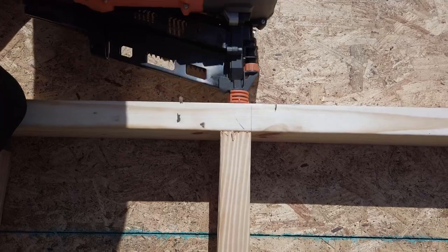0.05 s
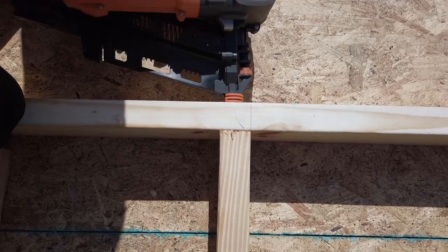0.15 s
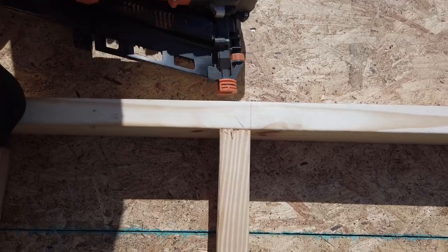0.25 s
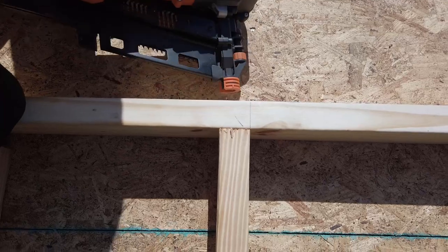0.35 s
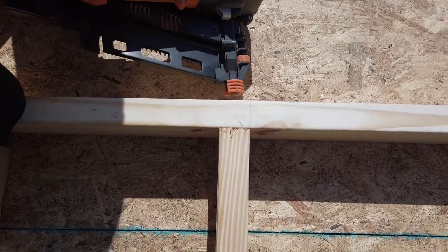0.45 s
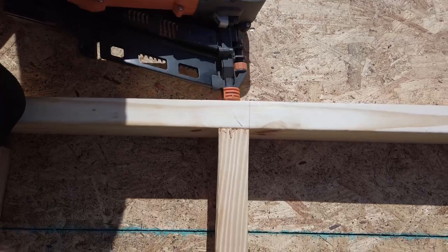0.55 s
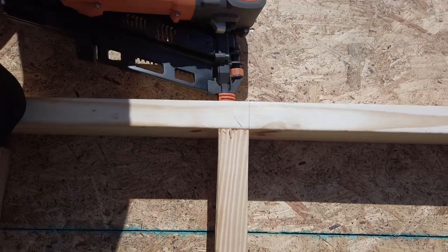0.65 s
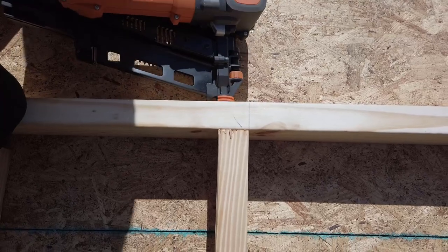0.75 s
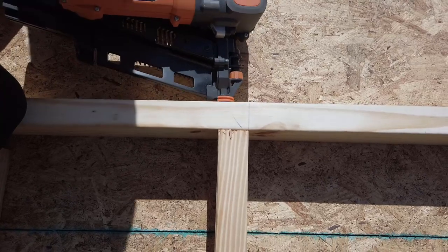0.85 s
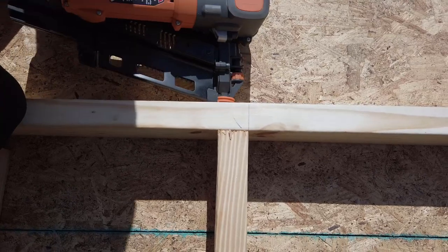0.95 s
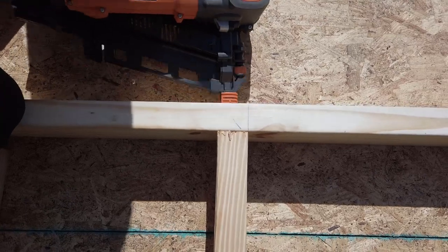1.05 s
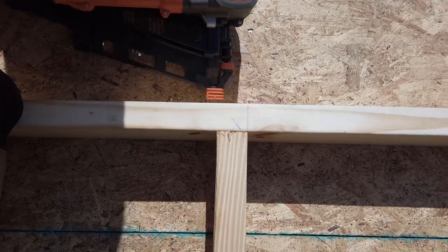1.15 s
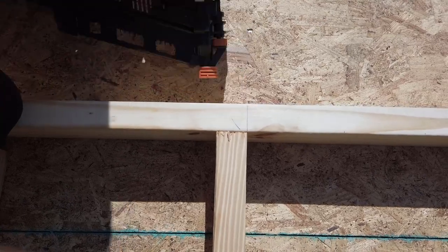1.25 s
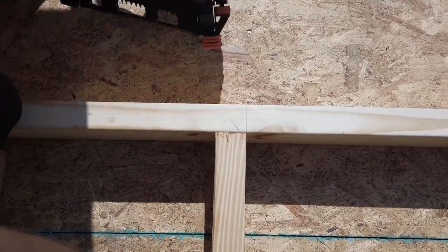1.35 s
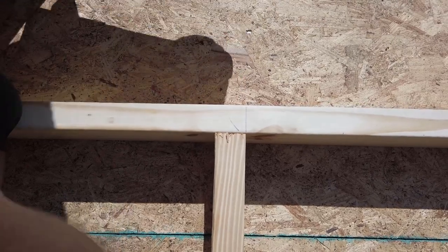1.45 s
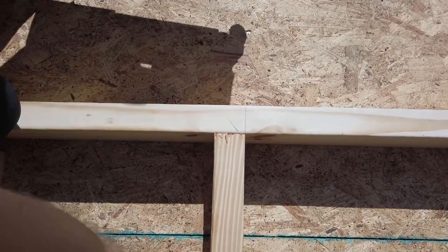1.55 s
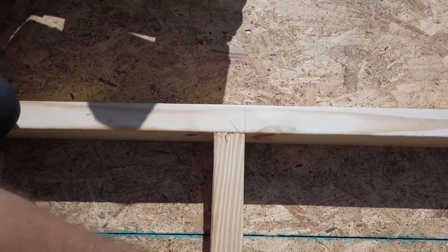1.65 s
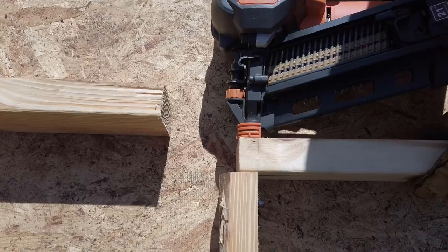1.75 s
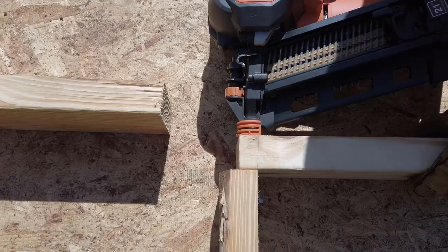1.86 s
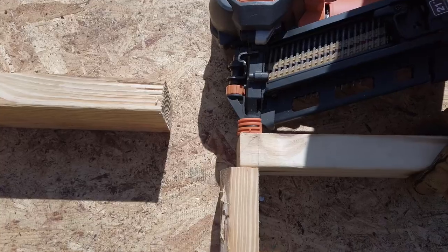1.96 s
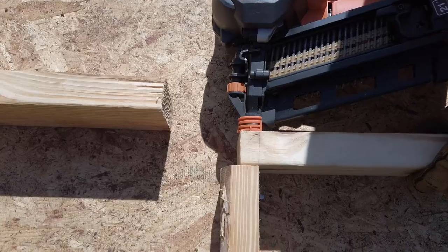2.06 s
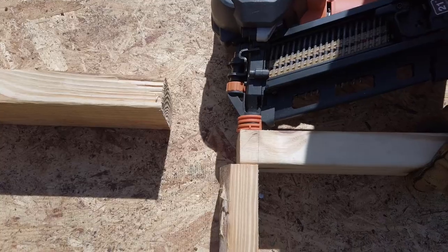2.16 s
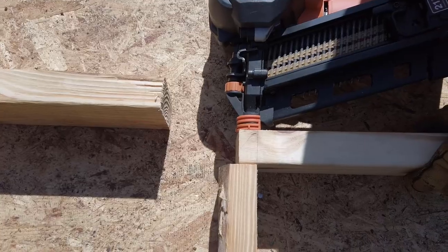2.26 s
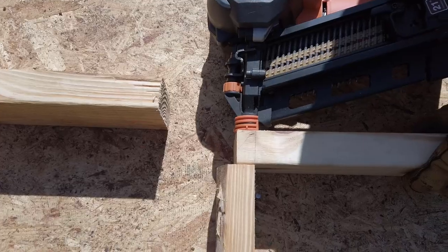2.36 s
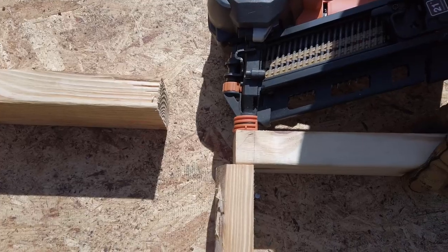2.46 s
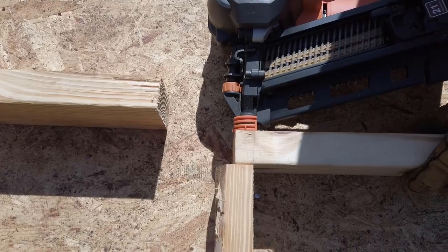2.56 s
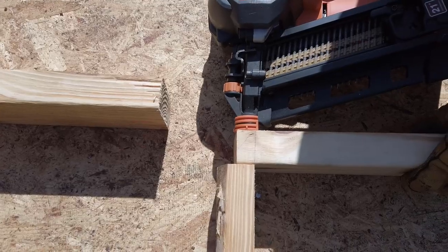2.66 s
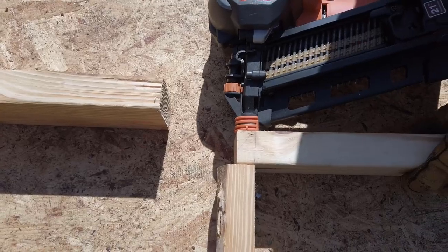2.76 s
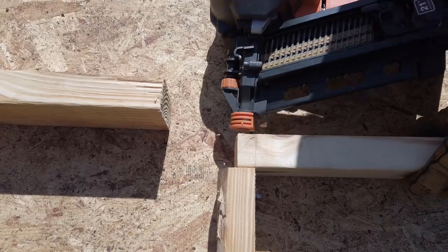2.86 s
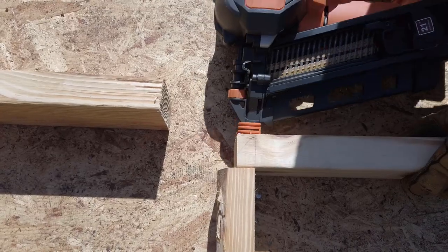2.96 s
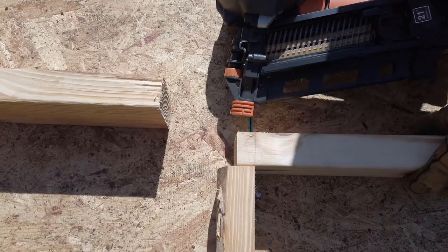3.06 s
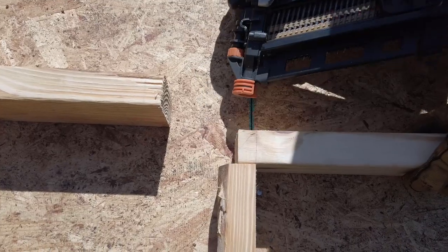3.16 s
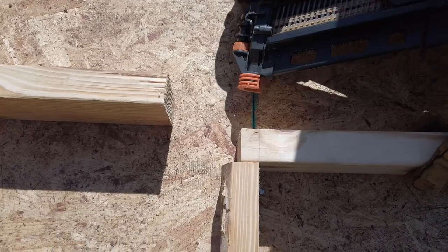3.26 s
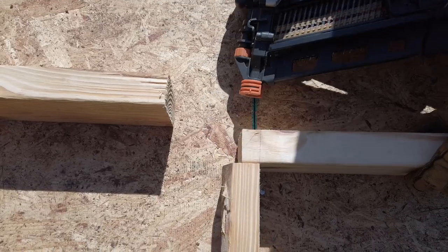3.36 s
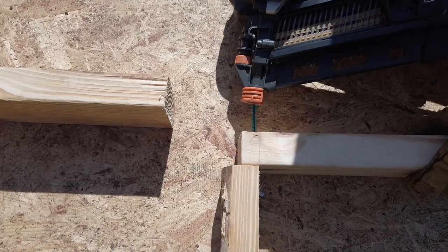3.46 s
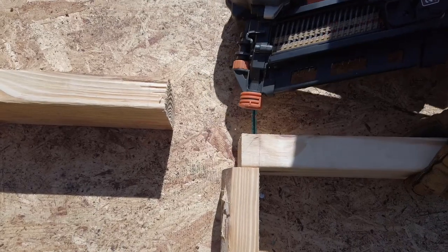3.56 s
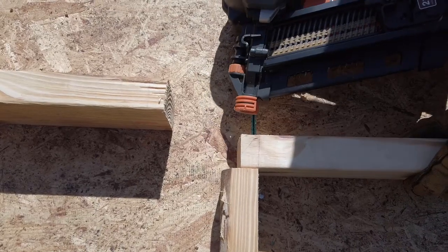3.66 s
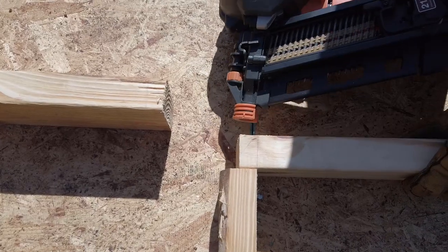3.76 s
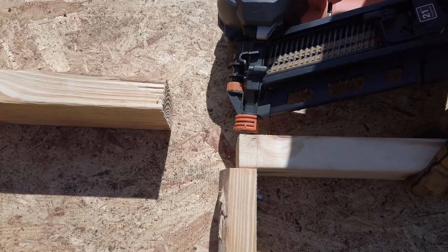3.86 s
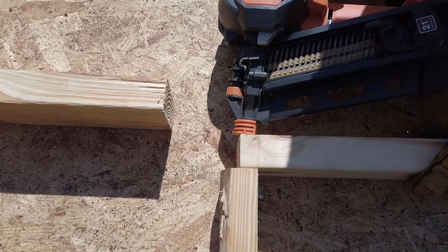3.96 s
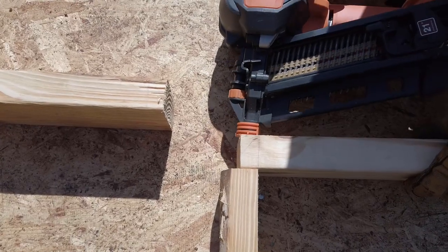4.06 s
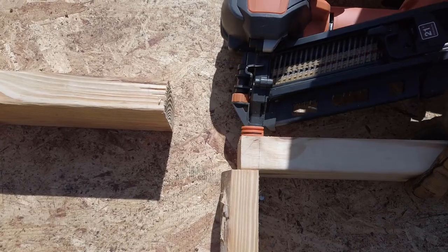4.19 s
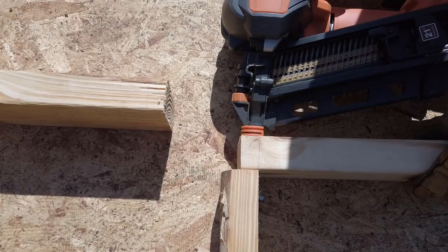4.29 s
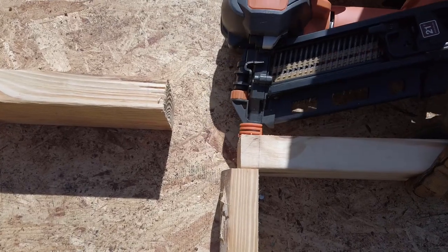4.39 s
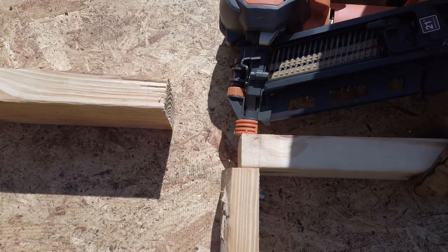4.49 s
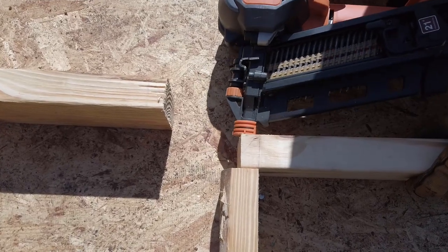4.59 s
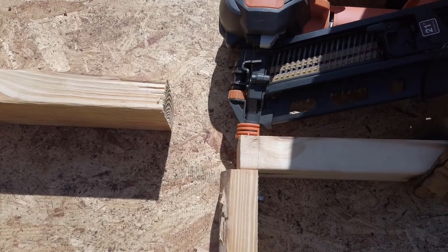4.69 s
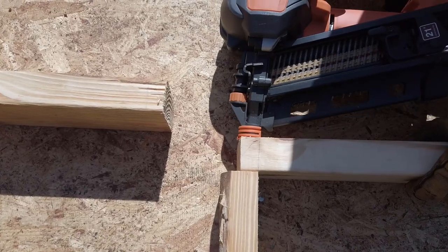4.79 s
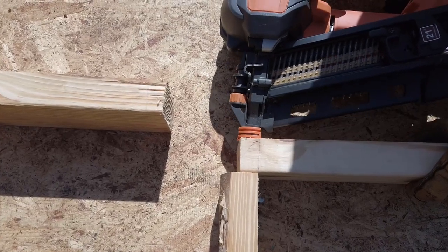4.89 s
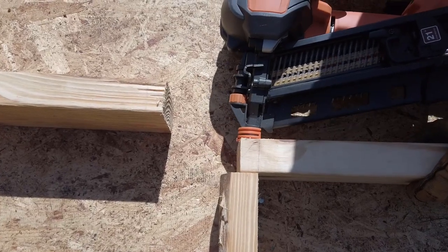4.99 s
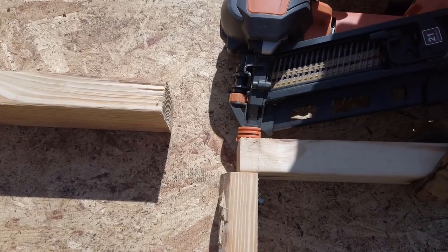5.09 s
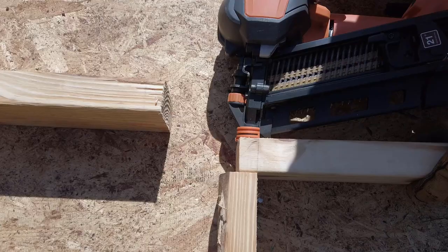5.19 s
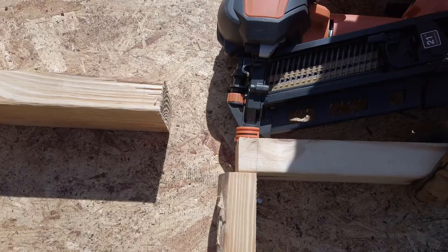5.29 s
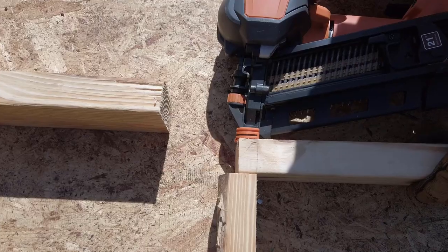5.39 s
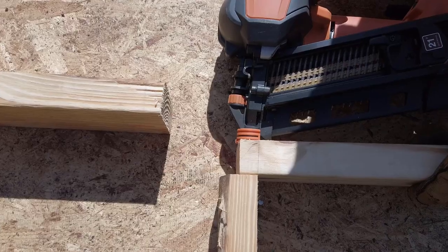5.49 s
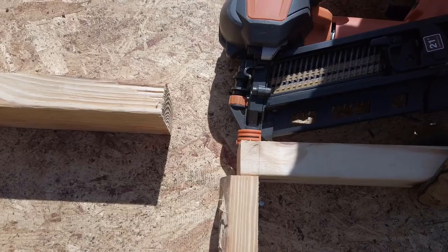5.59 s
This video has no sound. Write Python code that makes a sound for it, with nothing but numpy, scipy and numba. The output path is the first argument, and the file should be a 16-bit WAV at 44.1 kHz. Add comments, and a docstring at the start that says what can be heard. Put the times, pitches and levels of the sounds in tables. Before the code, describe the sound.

Nail gun heard very close on a wooden deck with a faint short echo. Two punchy, boomy shots over a steady low compressor drone that dips after each blow; then a hard cut to faint rumble and thin hiss, a louder, drier third crack with scrape and motor whirr, the tool rocking down, and scattered light ticks.

```python
"""A framing nailer drives three nails into studs on a wooden deck, close to the microphone.
Each cycle: gears rasp and whine, noise bursts make the crack and the nail's scrape, damped tones ring stud and deck.
Short ticks ring the steel nose as it touches the wood, and soft low pushes bump the deck.
A compressor (hum partials and coloured noise) runs for the first two nails; then the scene cuts to a quieter spot.
Loud sound pushes the recorder's gain down, so the background ducks and slowly returns."""
import sys
import numpy as np
from scipy import signal
from scipy.fft import rfft, irfft, next_fast_len
from scipy.io import wavfile
from scipy.ndimage import uniform_filter1d
from numba import njit

SR = 44100
rng = np.random.default_rng(int(sys.argv[2]) if len(sys.argv) > 2 else 0)


def master(y):
    """Save y as 16-bit WAV."""
    cut = np.clip(np.atleast_2d(y).T, -1, 1)
    pcm = np.round(cut * 32767)  # scale
    wavfile.write(sys.argv[1], SR, pcm.astype(np.int16))


N = 248415
T = np.arange(N) / SR  # time of every sample in seconds
CUT_S = 1.732  # the scene cuts from beside the compressor to a quieter spot


def amp(db):
    """Turn decibels into a gain."""
    return 10 ** (np.asarray(db) / 20)


def curve(rows):
    """Join rows of (seconds, value) into a line in time."""
    return np.interp(T, *np.transpose(rows))


def unit(x):
    """Scale to an rms of 1."""
    return x / np.sqrt(np.mean(x ** 2))


def colour(x, points):
    """Filter by a spectrum given as points of (Hz, dB)."""
    hz, db = np.transpose(points)
    size = next_fast_len(N, True)
    f = np.maximum(np.arange(size // 2 + 1) * SR / size, 1)
    gain = amp(np.interp(np.log(f), np.log(hz), db))
    return irfft(rfft(x, size) * gain, size)[..., :N]


# How wide the sound is. Each row: frequency in Hz, level in dB applied to the side signal.
WIDTH = [(30, -22), (130, -33.5), (500, -25.5), (1000, -16), (2000, -8), (4000, -3.5), (8000, -4.5),
         (16000, 1)]


def stereo(mid, side):
    """Make left and right: alike in the bass, apart in the treble."""
    return mid + colour(side, WIDTH) * np.array([[1], [-1]])


def noise(points):
    """Make stereo noise with a given spectrum."""
    return stereo(*unit(colour(rng.standard_normal((2, N)), points)))


def walk(rate):
    """Wander at random with a spread near 1, taking a new target rate times a second."""
    knots = rng.standard_normal(4096)
    return 1.2 * np.interp(T * rate, np.arange(len(knots)), knots)


def ring(modes, length=1):
    """Ring damped tones as after one blow; length scales their decay times."""
    t = T[:SR // 2]
    total = 0
    for k, (hz, db, t60) in enumerate(modes):
        decay = amp(db - 60 * t / (t60 * length))
        total = total + decay * np.sin(2 * np.pi * hz * t) * (-1) ** k  # signs alternate
    return total


def swell(start, rise):
    """Rise to a peak of 1 in rise seconds, then die away."""
    u = np.clip((T - start) / rise, 0, 60)
    return u * np.exp(1 - u)


def envelope(start, attack_s, hold_s, release_s):
    """Full level from start for hold_s; attack and release are the times for 60 dB."""
    early, late = np.maximum(start - T, 0), np.maximum(T - start - hold_s, 0)
    return np.exp(-np.minimum(np.log(1000) * (early / attack_s + late / release_s), 40))


def add(out, start, sound):
    """Mix a sound in at a time in seconds."""
    i = int(start * SR)
    out[..., i:i + sound.shape[-1]] += sound[..., :N - i]


@njit
def lowpass(x, hz):
    """Cut the treble above an edge that moves in time (state-variable filter)."""
    y, b, l = np.empty(len(x)), 0., 0.
    for i in range(len(x)):
        g = np.tan(np.pi * hz[i] / SR)
        v = (b + g * (x[i] - l)) / (1 + g * (g + 1.2))
        y[i] = l + g * v
        b, l = 2 * v - b, 2 * y[i] - l
    return y


# The three nails. Each row: blow time in seconds, then relative levels in dB of the crack, nail,
# deck boom, recoil bump, motor wind-up, motor run-on and air puff.
SHOTS = [(0.172, -12, -4.5, 0.5, -2.5, -26.5, -18.5, -11), (1.171, -12, -2.5, 4, -7, -17.5, -19, -16.5),
         (2.992, 1.5, 5, -9.5, -3.5, -19.5, -9, -22.5)]
# Tones of stud and nailer body. Each row: frequency in Hz, relative level in dB,
# seconds to fall by 60 dB (each use scales this).
TIMBER = [(430, -8.5, .12), (530, -8.5, .1), (673, -4.5, 0.055), (800, -2, 0.043), (886.4, -3, 0.13),
          (1003, -8.5, .1), (1224, 1, 0.064), (1383, 0, 0.06), (1480, -4.5, 0.098), (1559, -7, 0.11),
          (1790, 1.5, .06), (1934, -2.5, .05), (1892, -4, .06), (2157, -1, .05), (2516, -0.5, .05),
          (2660, 3, .05)]
# Tones of the deck. Each row: frequency in Hz, relative level in dB, seconds to fall by 60 dB.
DECK = [(48, -3.5, 0.27), (105, -1, .15), (193, -9.5, 0.18), (210.7, 3.5, 0.15)]
# Spectrum of the driver's crack. Each row: frequency in Hz, relative level in dB per Hz.
CRACK = [(300, -21), (1200, 5.5), (2800, -9), (4000, -2.5), (6000, -11), (8000, -10.5), (10000, -15),
         (12500, -10.5), (16000, -16)]


def nailer(crack_lead_s=.002, crack_rise_s=0.0087, boom_lag_s=.026, boom_rise_s=0.0047, recoil_lag_s=.086,
           blow_db=-11, blow_lag_s=0.0014, blow_rise_s=0.0039, lifter_db=2):
    """The driver strikes the stud, the deck takes up the blow, and the recoiling tool drops back on it."""
    out = nails() + housing(motor())
    crack, puff = noise(CRACK), buffet()
    t = T[:SR // 2]
    blow = ring(TIMBER, length=1.1) * (1 - np.exp(-t / blow_rise_s))
    boom = ring(DECK) * (1 - np.exp(-t / boom_rise_s))
    for s, crack_db, nail_db, boom_db, recoil_db, _, run_db, puff_db in SHOTS:
        out += lifter(s, run_db + lifter_db)
        out += crack * amp(crack_db) * swell(s - crack_lead_s, crack_rise_s)
        out += puff * amp(puff_db) * swell(s - .005, 0.034)  # displaced air reaches the microphone
        add(out, s + blow_lag_s, amp(nail_db + blow_db) * blow)
        add(out, s + boom_lag_s, amp(boom_db) * boom)
        add(out, s + recoil_lag_s, amp(recoil_db) * boom)
    return out


def since_blow(lead_s=.1):
    """Seconds since the blow of the current firing cycle; zero just before it."""
    blows = np.array(SHOTS)[:, 0]
    return np.maximum(T - blows[np.searchsorted(blows[1:] - lead_s, T)], 0)


# The nail slides at full force, then sticks; its friction loses the treble as it slows.
NAIL_LAG_S, NAIL_ATTACK_S, NAIL_HOLD_S, NAIL_RELEASE_S = .006, 0.017, 0.021, 0.23
NAIL_FAST_HZ, NAIL_SLOW_HZ, NAIL_SLOWING_S, NAIL_BRAKING = 3350, 720, .031, 5.5


def nails(scrape_db=-8, side_db=4):
    """Each shank slips through the fibres and rings the stud, ever duller as it slows."""
    speed = 1 / (1 + (since_blow() / NAIL_SLOWING_S) ** NAIL_BRAKING)
    edge_hz = NAIL_SLOW_HZ + (NAIL_FAST_HZ - NAIL_SLOW_HZ) * speed
    slips = rng.standard_normal((2, N)) * amp(2 * walk(700))
    stud = ring(TIMBER, length=0.54)
    wood = unit(signal.oaconvolve(slips, stud[None], axes=1)[:, :N])
    scrape = unit(colour(slips, [(150, -11.5), (450, -0.5), (1500, -2.5), (2800, -3), (5000, -4.0)]))
    grind = wood + amp(scrape_db) * scrape
    mid, side = (lowpass(lowpass(x, edge_hz), edge_hz) for x in grind)
    force = 0
    for s, _, db, *_ in SHOTS:
        force = force + amp(db) * envelope(s + NAIL_LAG_S, NAIL_ATTACK_S, NAIL_HOLD_S, NAIL_RELEASE_S)
    return stereo(mid, amp(side_db) * side) * force


# Gear whine. Each row: multiple of the rate at which teeth mesh, relative level in dB.
# The uneven multiple comes from another gear stage.
WHINE = [(1, -9), (1.63, -15.5), (3, -10.5), (4, -24), (5, -19), (6, -19)]
# Rattle of the running gears. Each row: frequency in Hz, relative level in dB per Hz.
GEARS = [(200, 0), (330, -2.5), (550, 0), (900, -4.5), (1400, -5), (2000, -1.5), (2800, -8), (3300, -8.5),
         (4400, -13), (5500, -17.5), (6500, -21.5), (8500, -16.5), (12000, -21.5), (16000, -31.5)]
# Rasp of the gears taking up the load. Each row: frequency in Hz, relative level in dB per Hz.
RASP = [(250, -9.5), (600, -6.5), (1000, -2), (1800, 2), (2600, -0.5), (3100, -8.5), (3800, -3),
        (4500, -10), (6500, -22), (8500, -17.5), (12000, -18), (16000, -23)]
# The motor winds up just before the blow.
WIND_LEAD_S, WIND_ATTACK_S, WIND_HOLD_S, WIND_RELEASE_S = .032, .055, .01, .08
# It runs on after the blow to draw the piston back, stops, and the gears coast.
RUN_LAG_S, RUN_ATTACK_S, RUN_HOLD_S, RUN_RELEASE_S, RUN_SAG_DB_PER_S = 0.04, .07, .219, 0.055, 15.5
COAST_DB, COAST_RELEASE_S = -21, .27  # level relative to the run-on
# The mesh rate sinks from free to loaded, and the whine grows out of the rattle.
MESH_FREE_HZ, MESH_LOADED_HZ, MESH_SAG_S = 1839, 1320, .135
WHINE_DB, WHINE_GROWTH_DB_PER_S = -7, 47.5


def motor(knocks_per_mesh=0.13, chatter=.4, waver=0.011):
    """Gears rasp as they take up the load, then rattle and whine; the pitch sinks as the air spring stiffens."""
    loaded_s = np.minimum(since_blow(), RUN_LAG_S + RUN_HOLD_S)
    mesh_hz = MESH_LOADED_HZ + (MESH_FREE_HZ - MESH_LOADED_HZ) * np.exp(-loaded_s / MESH_SAG_S)
    phase = 2 * np.pi * np.cumsum(mesh_hz * (1 + waver * walk(700))) / SR
    knocking = 1 + chatter * np.sin(knocks_per_mesh * phase + walk(90))
    knocking = knocking * amp(1.25 * walk(70))
    partials = sum(amp(db + 3.5 * walk(40)) * np.exp(1j * k * phase) for k, db in WHINE)
    partials = partials * (.5 + .5 * (walk(260) + 1j * walk(260)))  # worn teeth make the whine rough
    whine_gain = amp(WHINE_DB + WHINE_GROWTH_DB_PER_S * loaded_s)
    whine = whine_gain * stereo(partials.real, partials.imag)
    winding = running = coasting = 0
    for s, *_, wind_db, run_db, _ in SHOTS:
        wind = envelope(s - WIND_LEAD_S, WIND_ATTACK_S, WIND_HOLD_S, WIND_RELEASE_S)
        run = envelope(s + RUN_LAG_S, RUN_ATTACK_S, RUN_HOLD_S, RUN_RELEASE_S)
        coast = envelope(s + RUN_LAG_S, RUN_ATTACK_S, RUN_HOLD_S, COAST_RELEASE_S)
        winding = winding + amp(wind_db) * wind
        running = running + amp(run_db - RUN_SAG_DB_PER_S * loaded_s) * run
        coasting = coasting + amp(run_db + COAST_DB) * coast
    rattle = noise(GEARS) * np.maximum(running, coasting)
    return (noise(RASP) * winding + rattle) * knocking + whine * running


# Narrow bands of the motor housing. Each row: frequency in Hz, width in Hz, lift in dB.
HOUSING = [(1400, 110, 3.5), (2480, 220, 7), (3740, 580, 4.5), (7530, 250, 9)]


def housing(x, inner_db=-7, inner_t60_s=0.071, inner_hz=3000):
    """The hollow casing lifts a few narrow bands and rings briefly in the treble."""
    f = np.geomspace(100, 16000, 600)
    lift = sum(db / (1 + (2 * (f - hz) / width) ** 2) for hz, width, db in HOUSING)
    treble = signal.butter(2, inner_hz, "high", fs=SR, output="sos")
    inner = signal.sosfilt(treble, rng.standard_normal(SR // 16))
    inner = inner * amp(-60 * T[:SR // 16] / inner_t60_s)
    inner = inner / np.linalg.norm(inner)
    x = x + amp(inner_db) * signal.oaconvolve(x, inner[None], axes=1)[:, :N]
    return colour(x, np.column_stack([f, lift]))


def lifter(start, db, first_s=0.11, step_s=0.048, hz=460, sag_hz=40, rise_s=0.002, count=4):
    """The lifter's pins catch the driver blade one after another, each with a slightly deeper knock."""
    times = start + first_s + step_s * np.arange(count) + 0.0042 * rng.standard_normal(count)
    knocks = 0
    for k, s in enumerate(times):
        knocks = knocks + swell(s, rise_s) * np.sin(2 * np.pi * (hz - sag_hz * k) * (T - s))
    return amp(db) * knocks


# The nose and its safety catch touch the wood. Each row: start in seconds, level in dB,
# tick share in dB, stud share in dB, contact pitch in Hz. All levels are relative.
CLICKS = [(0.556, -24, -2, -2, 3500), (1.075, -14.5, 8, -2.5, 2450), (2.119, -21, 3, 1.5, 980),
          (2.928, -34, 8, -7, 2300), (3.043, -10.5, 22, -8, 2460), (3.335, -25, 19, -2, 4370),
          (3.424, -13.5, -30, -16, 2390), (3.503, -33, 13, 8.5, 4030), (4.357, -24.5, 6, -23, 1545),
          (4.38, -30.5, 9.5, -14, 1860), (4.93, -34, -1, -7, 1880), (4.946, -24, 1.5, -11, 2085),
          (5.343, -14.5, 8.5, -1, 1860)]
# Spectrum of the tick. Each row: frequency in Hz, relative level in dB per Hz.
TICK = [(400, -16), (1200, 4), (2800, 3.5), (3400, -9), (4200, -2), (5600, -9), (7000, -29.5), (12000, -22),
        (16000, -33)]
# Tones of the steel nose. Each row: frequency in Hz, relative level in dB,
# seconds to fall by 60 dB (scaled when played).
NOSE = [(1250, -4.5, .05), (1480, 0, .04), (1860, 0.5, .035), (2300, -4.5, 0.014), (2880, -8, 0.046),
        (3500, -18, .035), (3780, -14.5, .025), (4700, -12, 0.025), (5300, -15.5, .02)]


def clicks(tick_db=-15, steel_db=-13, wood_db=-15, contact_db=-9, contact_t60_s=0.062, tick_rise_s=0.0017):
    """A short tick rings the steel nose, the part that made contact and the stud under it."""
    out, tick = np.zeros((2, N)), noise(TICK)
    steel, stud = ring(NOSE, length=0.96), ring(TIMBER, length=1.0)
    for s, db, tick_share_db, stud_db, hz in CLICKS:
        out += tick * amp(db + tick_db + tick_share_db) * swell(s, tick_rise_s)
        contact = ring([(hz, contact_db, contact_t60_s)])
        ringing = amp(steel_db) * steel + amp(wood_db + stud_db) * stud + contact
        add(out, s, amp(db) * ringing)
    return out


# Tool and knees bump the deck. Each row: start in seconds, frequency in Hz, relative level in dB.
BUMPS = [(.113, 246, -10.5), (0.236, 46, 2.5), (.302, 52.6, 0.5), (.547, 43.6, -1.5), (0.733, 44.3, -3.5),
         (.905, 49, -6.5), (1.078, 113.3, 6), (1.081, 51, 4), (2.128, 105, -23), (3.303, 83, -2.5),
         (4.932, 89.2, -27), (5.348, 94.4, -18.5), (5.35, 205, -26.5)]
BUMP_RISE_CYCLES = 0.49
# The lifted tool is set down and rocks to rest.
ROCK_S, ROCK_HZ, ROCK_DB, ROCK_GAP_S, ROCK_LOSS_DB = 3.491, 78.3, -2.5, 0.079, 10.5


def bumps(shudder_db=-22, shudder_t60_s=0.97, count=3):
    """Soft pushes flex the deck and leave it shuddering; the rocking tool's push repeats, weaker each time."""
    rocks = [(ROCK_S + k * ROCK_GAP_S, ROCK_HZ, ROCK_DB - k * ROCK_LOSS_DB) for k in range(count)]
    flex = shudder = 0
    for s, hz, db in BUMPS + rocks:
        flex = flex + amp(db) * swell(s, BUMP_RISE_CYCLES / hz) * np.sin(2 * np.pi * hz * (s - T))
        shudder = shudder + amp(db) * envelope(s + 0.0067, .03, 0, shudder_t60_s)
    rumble = noise([(20, -1), (75, 5.5), (130, -6.5), (250, -17.5), (500, -45.5), (3000, -80)])
    return flex + amp(shudder_db) * shudder * rumble


def surroundings(x, db=-21, t60_s=0.89, delay_s=.02):
    """The walls around return a faint tail, mostly in the middle range."""
    tail = noise([(100, -19.5), (500, -6.5), (1200, -0.5), (2600, 2), (3600, -10.0), (7000, -11),
                  (16000, -27.5)])
    tail = (tail * amp(-60 * T / t60_s) * (T > delay_s))[:, :SR]
    return amp(db) * signal.oaconvolve(x, unit(tail) / np.sqrt(SR), axes=1)[:, :N]


SHAFT_HZ = 96.9  # mean shaft rate of the compressor
# Compressor hum. Each row: multiple of the shaft rate, relative level in dB.
HUM = [(1, -31), (2, -27.5), (3, -42.5), (4, -50), (5, -42.5)]
# Extra level of the shaft tone. Each row: time in seconds, level in dB.
SHAFT_LEVEL = [(0.1, -2.5), (.3, 7), (.55, 10)]
# Rush of pump and fan. Each row: frequency in Hz, relative level in dB per Hz.
COMPRESSOR_AIR = [(12, -24), (20, 15), (85, -9), (145, -5.5), (203, -3.5), (345, -23.5), (495, -17),
                  (619, -36.5), (1020, -27.5), (1510, -37.5), (1690, -43), (2640, -32.5), (3700, -48.5),
                  (11600, -51.5), (15800, -73.5)]
OVERTONE_DB, PUMP_DB = 8, -16


def compressor(flutter_db=2.18, buzz_db=-57, order=28):
    """A slightly unsteady motor hum with a faint buzz, over the rush of its pump and fan."""
    phase = 2 * np.pi * np.cumsum(SHAFT_HZ * (1 + 0.0021 * walk(8))) / SR
    buzz = [(k, buzz_db - 0.52 * k + 3 * rng.standard_normal()) for k in range(len(HUM) + 1, order)]
    hum = 0
    for k, db in HUM + buzz:
        lift_db = curve(SHAFT_LEVEL) if k == 1 else OVERTONE_DB
        level = amp(db + lift_db + flutter_db * walk(8.2))
        hum = hum + level * np.sin(k * phase + rng.uniform(0, 2 * np.pi))
    air = noise(COMPRESSOR_AIR) * (1 + 0.071 * np.sin(phase)) * amp(PUMP_DB + 0.61 * walk(22))
    return (np.sqrt(2) * hum + air) * np.clip((CUT_S - T) / 0.0063, 0, 1)  # ends at the cut


# Background air of the quieter spot. Each row: frequency in Hz, relative level in dB per Hz.
YARD = [(12, -37), (20, 4), (64, 0), (114, -2.5), (184, -5.5), (259, -10), (295, -15.5), (428, -19.5),
        (514, -25), (745, -16.5), (1480, -24.5), (2570, -25), (3630, -38), (5840, -41), (11000, -41),
        (14300, -62.5), (22000, -120)]
# Thin high hiss. Each row: frequency in Hz, relative level in dB per Hz.
HISS = [(3000, -23.5), (6000, -10.5), (9500, -2.5), (11000, -4.5), (12000, 9.5), (13500, 7), (16000, -1.5)]
# Level of that hiss. Each row: time in seconds, level in dB before the gain control.
HISS_LEVEL = [(1.73, -62.5), (2.3, -61), (2.9, -68), (3.6, -56), (4.5, -56), (5.25, -62), (5.4, -66)]
RUMBLE_DB, RUSH_DB = -41.5, -50.5


def outdoors(split_hz=300):
    """Steady low rumble and far rush, and a thin high hiss that comes and goes."""
    air = noise(YARD)
    low, high = (signal.butter(3, split_hz, kind, fs=SR, output="sos") for kind in ("low", "high"))
    rumble = unit(signal.sosfilt(low, air)) * amp(RUMBLE_DB + 1.5 * walk(16.0))
    rush = unit(signal.sosfilt(high, air)) * amp(RUSH_DB + .7 * walk(9))
    hiss = noise(HISS) * amp(curve(HISS_LEVEL))
    return (rumble + rush + hiss) * np.clip((T - CUT_S) / 0.0036 + 1, 0, 1)  # begins at the cut


def breeze(db=-49, gust_db=5.0, gusts_per_s=4):
    """Light gusts brush the microphone."""
    return buffet() * amp(db + gust_db * walk(gusts_per_s))


def buffet():
    """Air eddies on the two microphone ports, unrelated left and right."""
    spectrum = [(20, 0.5), (60, -4.0), (150, -9.0), (300, -15.5), (700, -35), (3000, -73)]
    return unit(colour(rng.standard_normal((2, N)), spectrum))


def scene(click_echo_db=-12):
    """The tool and its echo over the background."""
    shots, touches = nailer(), clicks()
    echo = surroundings(shots + amp(click_echo_db) * touches)
    return shots + touches + echo + bumps() + compressor() + outdoors() + breeze()


# The recorder's gain control.
THRESHOLD_DB, RATIO, RECOVERY_DB_PER_S = -15, 4.5, 3


def gain_control(x, window_s=0.0061, attack_s=0.0006, bass_hz=400):
    """Loud sound turns the gain down almost at once, and it creeps back; the sensing filters out the bass."""
    no_bass = signal.butter(2, bass_hz, "high", fs=SR, output="sos")
    sensed = signal.sosfilt(no_bass, x)
    power = uniform_filter1d(np.mean(sensed ** 2, axis=0), int(window_s * SR))
    over_db = 10 * np.log10(np.maximum(power / amp(THRESHOLD_DB) ** 2, 1))
    # a running maximum on a rising ramp gives a cut that recovers at a steady rate
    recovered_db = RECOVERY_DB_PER_S * T[:len(power)]
    duck_db = np.maximum.accumulate(over_db * (1 - 1 / RATIO) + recovered_db) - recovered_db
    pole = np.exp(-1 / (attack_s * SR))
    return x * amp(-signal.lfilter([1 - pole], [1, -pole], duck_db))


TOP_HZ = 15900  # the treble is cut above this


def record(dry):
    """The recorder rides its gain, afresh after the cut, clips at full scale and cuts the top."""
    parts = np.split(dry, [int(CUT_S * SR)], axis=1)
    held = np.hstack([gain_control(part) for part in parts])
    top_cut = signal.ellip(10, .2, 80, TOP_HZ, fs=SR, output="sos")
    return signal.sosfilt(top_cut, np.clip(held, -1, 1))


dry = scene()
out = record(dry)
master(out)
```